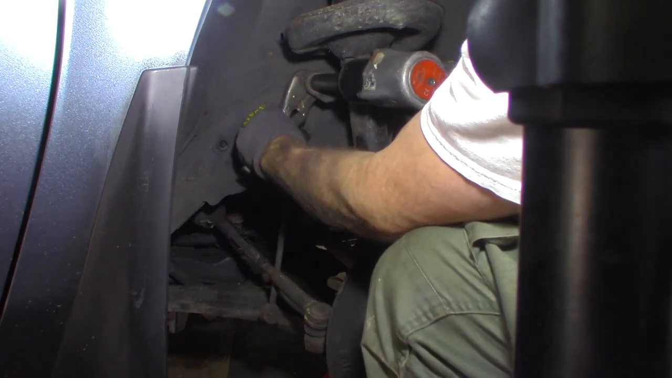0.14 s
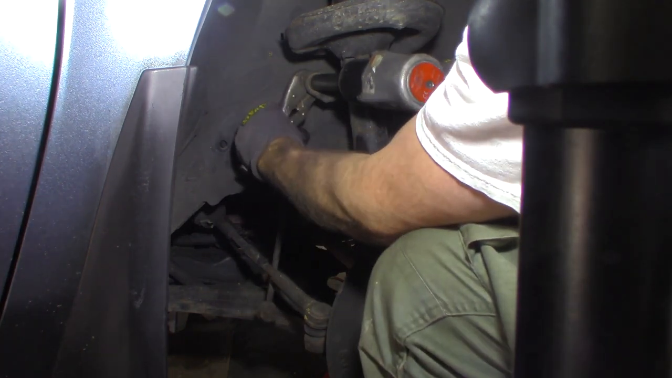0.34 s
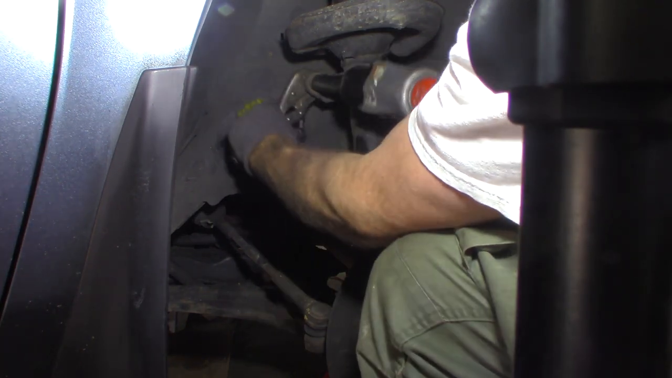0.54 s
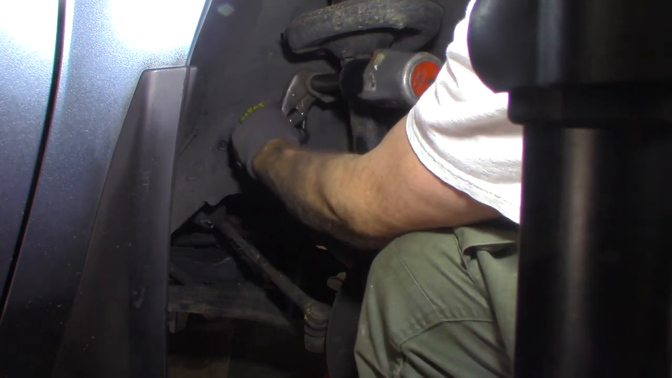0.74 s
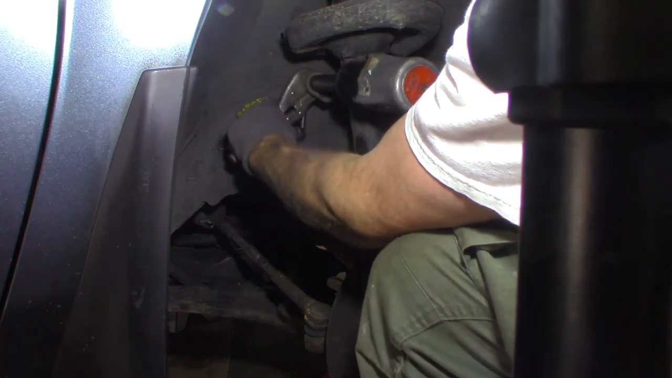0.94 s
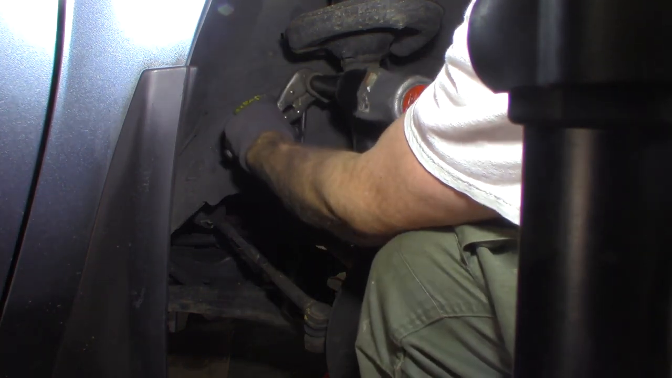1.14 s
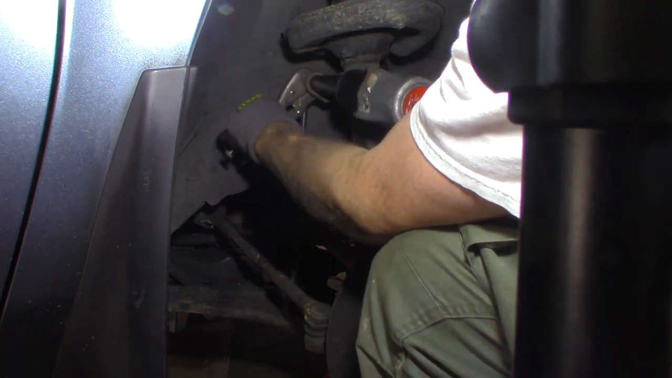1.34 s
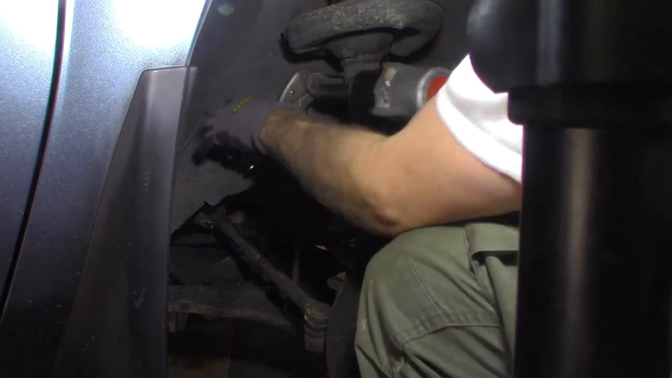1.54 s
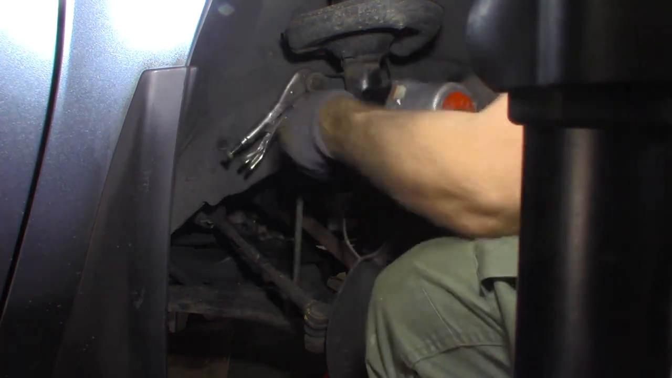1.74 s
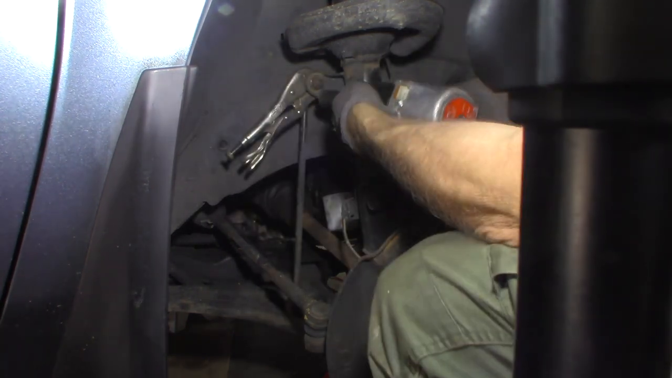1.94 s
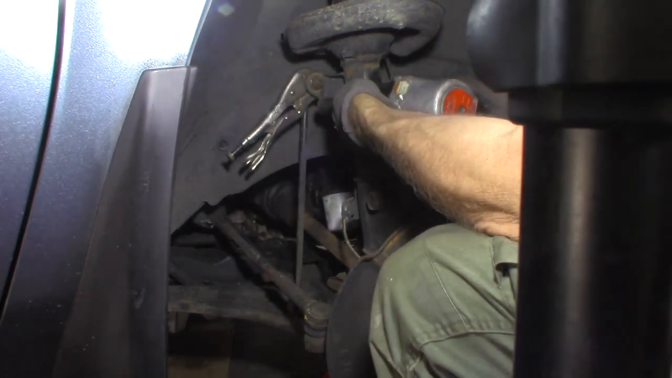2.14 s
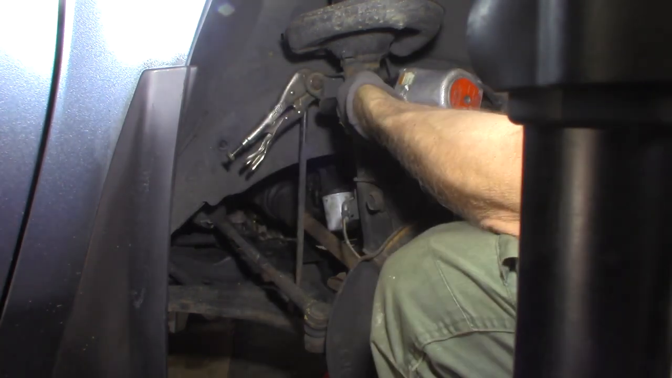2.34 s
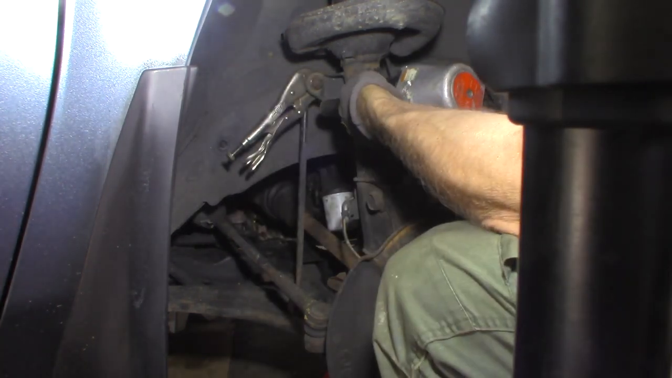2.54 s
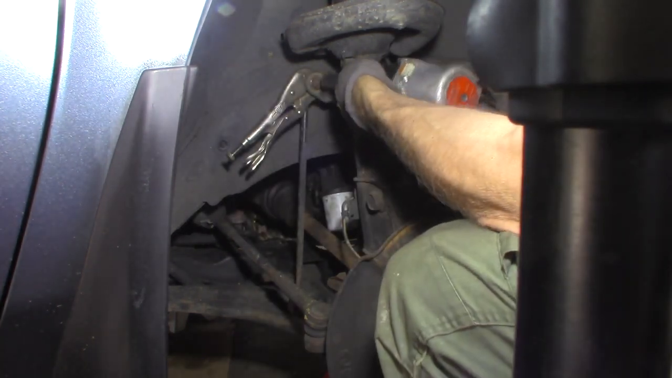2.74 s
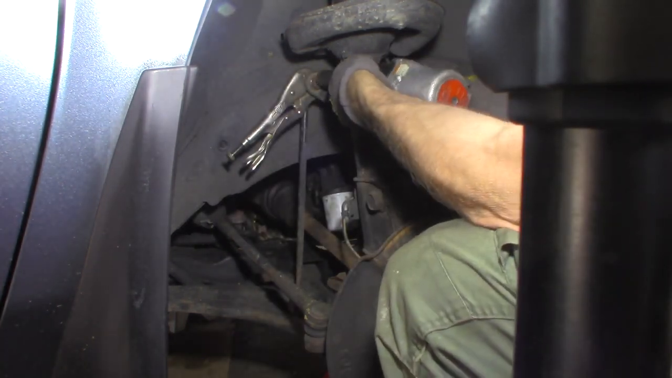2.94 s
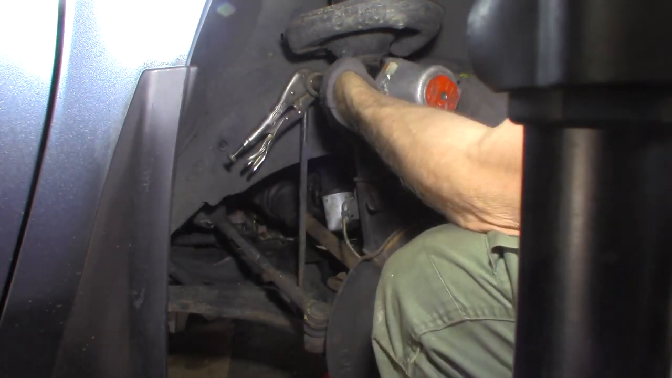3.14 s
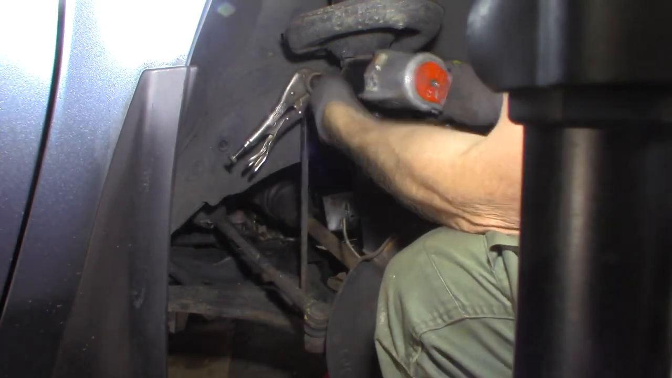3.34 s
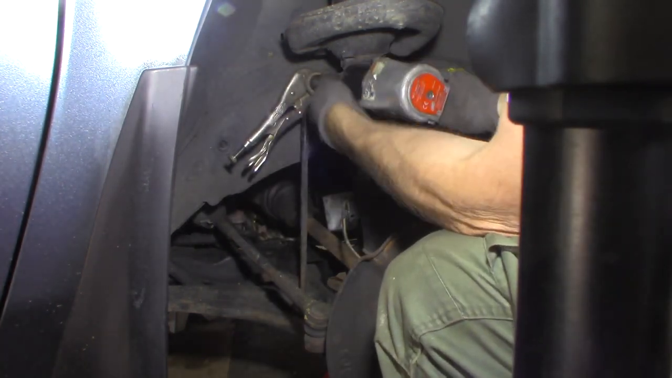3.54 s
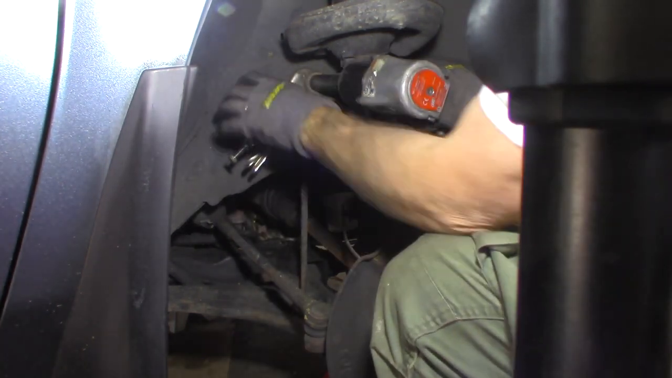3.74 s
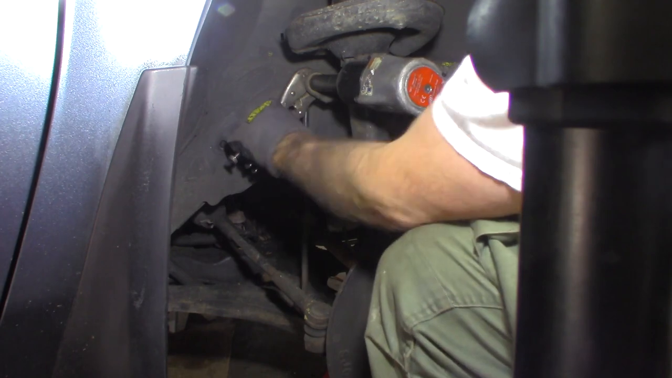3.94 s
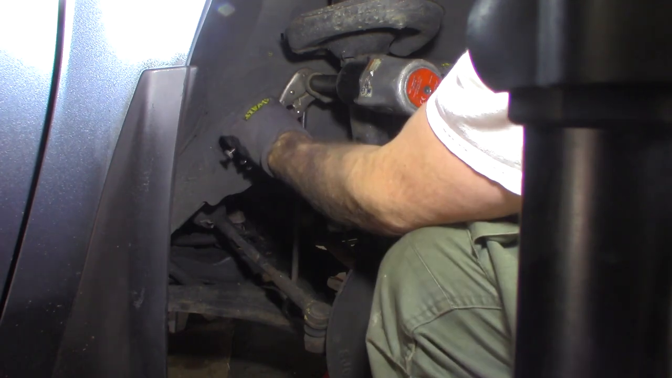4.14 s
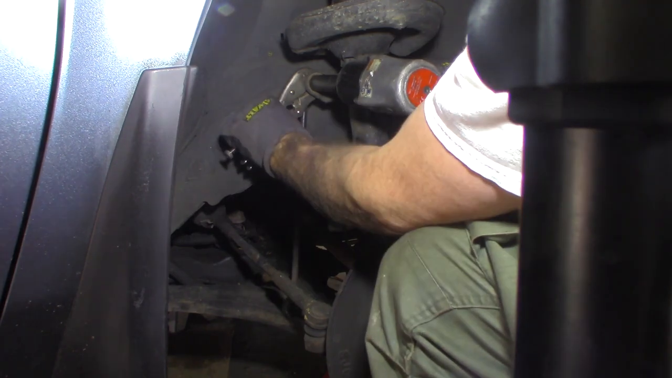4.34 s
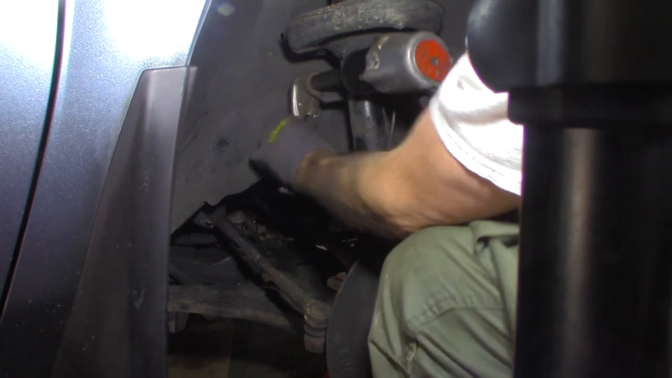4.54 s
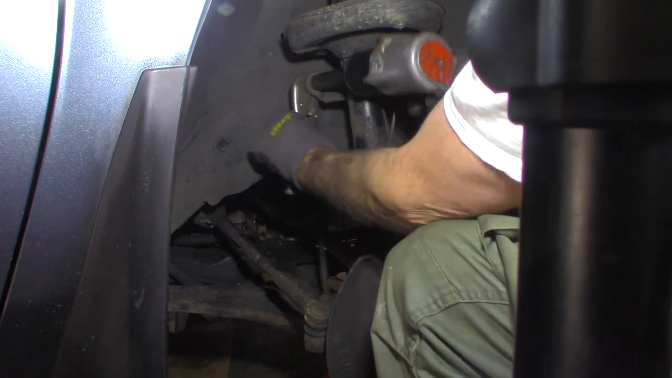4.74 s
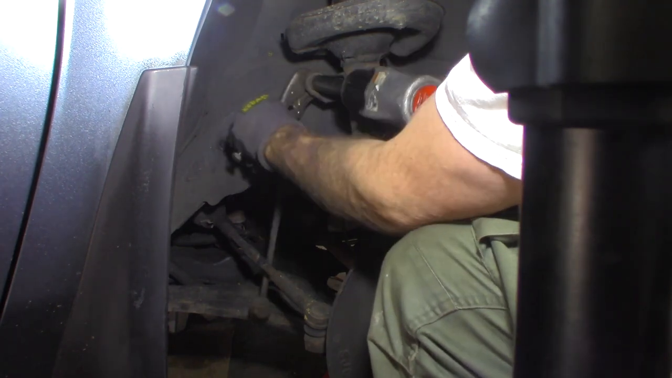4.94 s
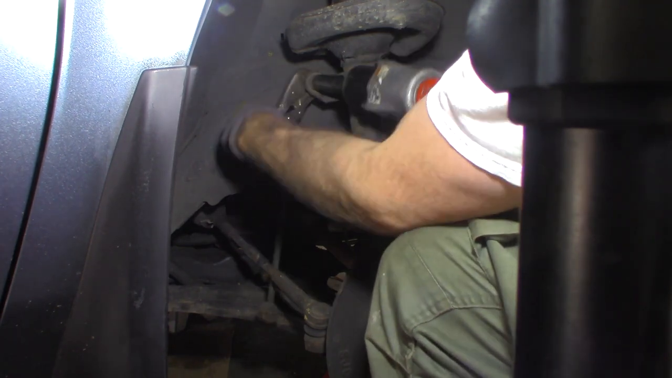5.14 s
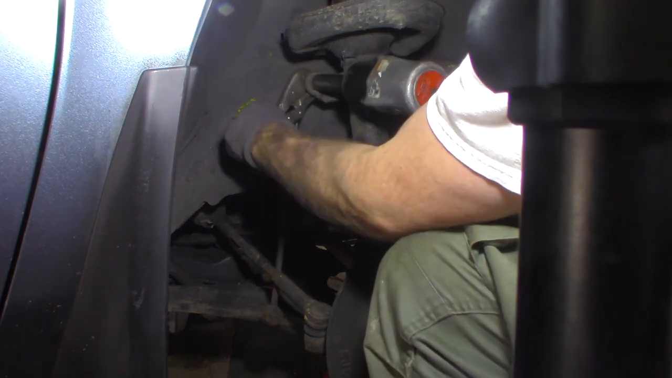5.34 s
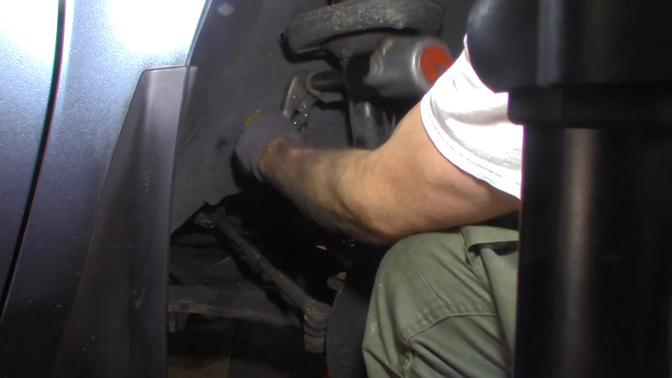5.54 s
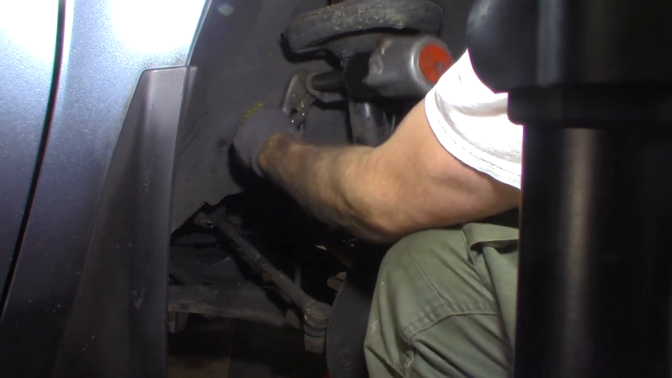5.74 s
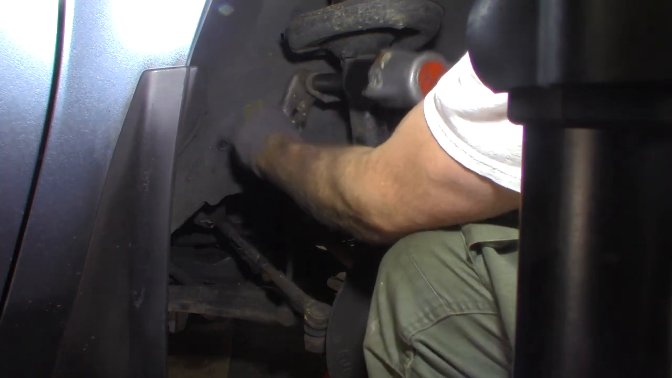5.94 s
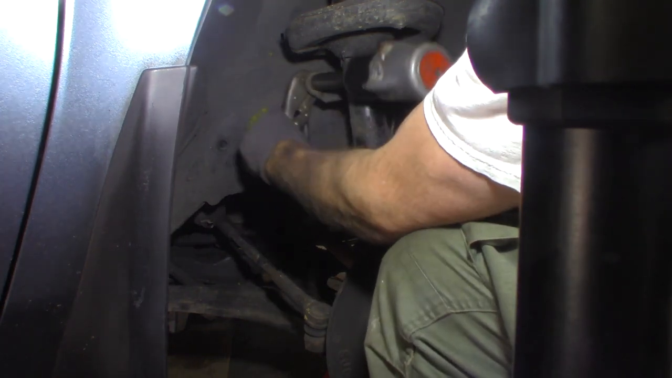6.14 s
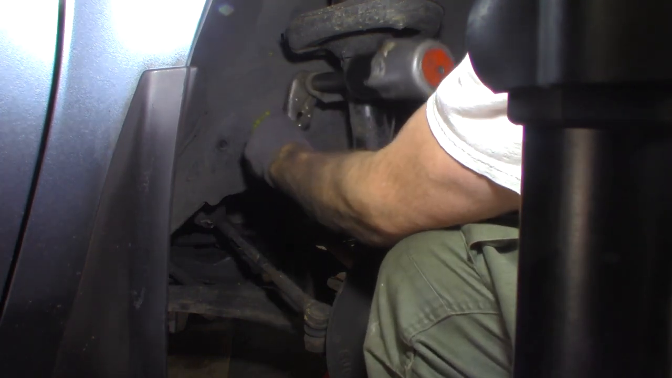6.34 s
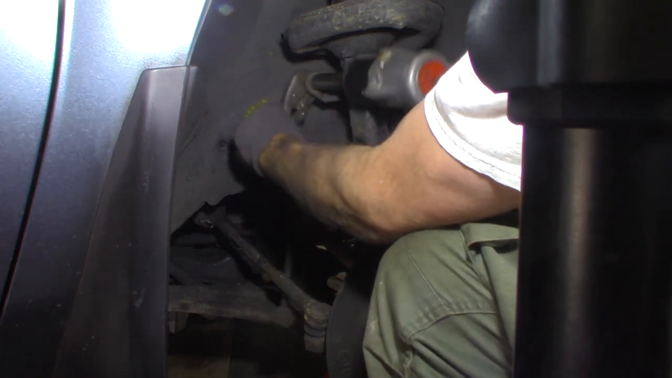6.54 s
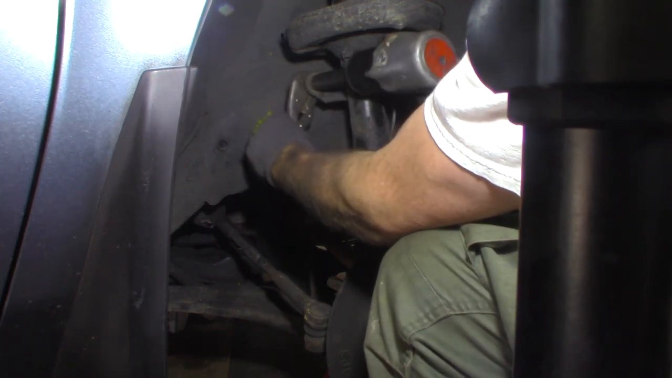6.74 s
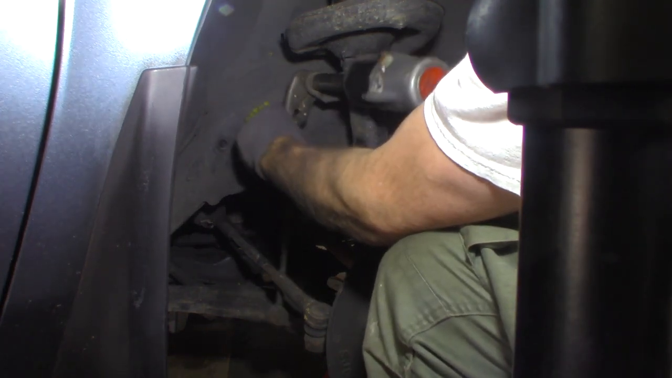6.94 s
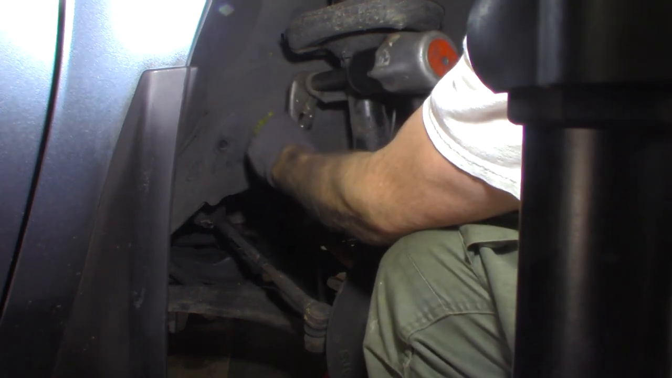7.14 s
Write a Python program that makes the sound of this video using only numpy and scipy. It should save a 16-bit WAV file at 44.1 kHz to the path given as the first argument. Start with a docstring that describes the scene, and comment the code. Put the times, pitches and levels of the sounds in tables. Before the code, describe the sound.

A close, loud pneumatic impact wrench in a garage with short reflections and faint dull room noise. After soft rubbing, the trigger opens at about 0.3 s: a rough howl and hiss with clustered metallic cracks, puffs of air and a tiny high whistle. The motor revs up and sags until 1.3 s, with scattered blows near 0.75, 0.9 and 1.05. Two steel clinks come at 1.4-1.5, then faint rustle and ticks. One hard, bright snap hits at 2.55 with a diffuse tail. Rattles and rubbing at 3.0-3.4 lead to a scrape of sliding steel at 3.55-3.75. At 4.4 a sharp blow starts a high-revving burst, hammering rapidly until 4.7 and stopping by 4.87. Heavy thuds and clanks follow, strongest at 5.16. From 5.48 to the end, steady hissing exhaust carries dense hammering runs, nearly fifty blows a second, with short gaps between.

```python
"""In a garage, a pneumatic impact wrench works a rusted nut in a car's wheel well.
The vane motor howls (pulse tones and noise) and hisses (chopped noise), sagging at each hammer blow.
Each blow is a dense crack on the anvil with a puff of air; short jet tones whistle now and then.
Between bursts the socket is pulled off, knocked about and slid back on: decaying clatter, one hard snap,
and uneven friction noise. Sparse garage reflections and room noise surround it; a limiter holds the peaks."""
import sys
import numpy as np
from scipy import signal
from scipy.fft import rfft, irfft
from scipy.io import wavfile
from scipy.ndimage import uniform_filter1d, minimum_filter1d

SR = 44100
rng = np.random.default_rng(int(sys.argv[2]) if len(sys.argv) > 2 else 0)


def dump(signal):
    """Clip the signal to [-1, 1] and save it as 16-bit WAV at the path in sys.argv[1]."""
    limited = np.clip(np.atleast_2d(signal).T, -1, 1)
    pcm = np.round(limited * 32767).astype(np.int16)
    wavfile.write(sys.argv[1], SR, pcm)


N = 317064
TIME = np.arange(N) / SR


def amp(db):
    """Decibels to gain."""
    return 10 ** (np.asarray(db) / 20)


def unit(x):
    """Scales to rms 1."""
    return x / np.sqrt(np.mean(x ** 2) + 1e-20)


def read(points, hz):
    """Reads a table on a log-frequency axis."""
    f, value = np.transpose(points)
    return np.interp(np.log(hz + 1), np.log(f + 1), value)


def add(mix, s, sound):
    """Mixes a sound in at a time in seconds."""
    part = mix[max(round(s * SR), 0):][:len(sound)]
    part += sound[:len(part)]


def colour(x, spectrum, size=4096):
    """Causal (minimum-phase) filter with the shape of the given spectrum and energy 1."""
    hz = abs(np.fft.fftfreq(size, 1 / SR))
    log_gain = np.log(amp(read(spectrum, hz)))
    response = np.exp(np.conj(signal.hilbert(log_gain)))
    taps = np.fft.ifft(response).real[:size // 2]
    return signal.oaconvolve(x, taps / np.linalg.norm(taps))[:N]


def noise():
    """White noise."""
    return rng.standard_normal(N)


def wander(rate_hz):
    """Random drift of rms 1, mostly slower than the given rate."""
    lowpass = 1 / (1 + (np.fft.rfftfreq(N, 1 / SR) / rate_hz) ** 4)
    return unit(irfft(rfft(noise()) * lowpass, N))


def strike(t60, rise_s=0.00071, size=12000):
    """A dense, even clatter of contacts that builds up quickly and dies away by 60 dB in t60 seconds."""
    t = np.arange(size) / SR
    contacts = rng.choice([-1., 1.], size)
    return contacts * (1 - np.exp(-t / rise_s)) * amp(-60 * t / t60)


# Room noise. Each row: frequency in Hz, relative level in dB per Hz.
ROOM_NOISE_SPECTRUM = [(25,-26),(80,-7),(300,-6),(600,-11.5),(2000,-19.5),(9000,-33.5),(16000,-47)]


def room_noise(level_db=-54):
    """Steady, dull background: coloured noise."""
    return amp(level_db) * colour(noise(), ROOM_NOISE_SPECTRUM)


# Shifts of gloves and tool, each swelling and fading. Each row: peak in seconds, rise in seconds,
# fade in seconds, dull rubbing in dB and fine rustle in dB, both before the trims in handling().
SHIFTS = [(0,0.054,0.083,-38,-69),(1.56,0.057,0.27,-43,-46),(1.84,0.017,0.014,-53.5,-47),(2.08,.1,.15,-57.5,-63),(3.13,.05,0.066,-32.5,-56),(3.39,0.06,0.063,-34,-52),(3.83,0.065,0.055,-56,-43),(3.92,0.045,0.092,-50,-67),(4.17,0.05,0.064,-49,-71),(5.28,0.058,0.078,-26.5,-54)]
# Sliding steel. Each row: frequency in Hz, relative level in dB per Hz.
SCRAPE_SPECTRUM = [(40,-36),(130,-6),(320,-0.5),(800,-5),(1100,-0.5),(1900,-18),(2150,-14),(2380,-3),(2820,-11),(3100,-21),(4050,-33),(4400,-8.5),(4900,-24),(6000,-30),(6600,-15),(7600,-29),(8150,-18),(9000,-31),(15000,-50)]
# Dull rubbing, with the car body's low boom near 128 Hz. Each row: frequency in Hz, relative level in dB per
# Hz.
RUB_SPECTRUM = [(30,-28.5),(100,-13),(128,10),(165,-4),(300,4.5),(600,-3.5),(1200,-14.5),(2400,-25.5),(6000,-54)]
GRIP_RUB_DB, GRIP_RUSTLE_DB = -71.5, -73  # the gloves never lie quite still; before the same trims
# the socket sliding on steel
SLIDE_START_S, SLIDE_END_S = 3.53, 3.742
SLIDE_RISE_S, SLIDE_FALL_S, SLIDE_DB = 0.092, 0.037, -31.5


def handling(grain_db=1.5, rub_trim_db=-3, rustle_trim_db=-3):
    """Uneven friction of sliding steel, gloves and sleeves: noise whose level wanders."""
    def slips():
        return unit(noise() * amp(grain_db * wander(170)))
    rise = (TIME - SLIDE_START_S) / SLIDE_RISE_S
    fall = (SLIDE_END_S - TIME) / SLIDE_FALL_S
    push = np.clip(np.minimum(rise, fall), 0, 1)
    dull, fine = amp(GRIP_RUB_DB), amp(GRIP_RUSTLE_DB)
    for s, rise_s, fade_s, dull_db, fine_db in SHIFTS:
        swell = np.exp(-np.maximum((s - TIME) / rise_s, (TIME - s) / fade_s))
        dull = dull + amp(dull_db) * swell
        fine = fine + amp(fine_db) * swell
    slide = amp(SLIDE_DB) * colour(slips() * push, SCRAPE_SPECTRUM)
    rub = amp(rub_trim_db) * colour(slips() * dull, RUB_SPECTRUM)
    rustle_spectrum = [(1000, -8.5), (3000, -2), (6500, 0), (10000, -10.0), (15000, -18.5)]  # (Hz, dB per Hz)
    rustle = amp(rustle_trim_db) * colour(slips() * fine, rustle_spectrum)
    return slide + rub + rustle


# How fast the garage dies away. Each row: frequency in Hz, decay t60 in seconds.
GARAGE_DECAY = [(100,0.28),(400,0.4),(1000,0.66),(2800,0.59),(7300,0.37),(15000,0.77)]


def garage(x, size=20):
    """Sparse reflections of random sign, each band dying at its own speed."""
    taps = np.zeros(SR)
    at = np.arange(int(.006 * SR), SR - size, size)  # one in each slot of `size` samples, from 6 ms on
    taps[at + rng.integers(0, size, len(at))] = rng.choice([-1., 1.], len(at))
    hz, t, bands = signal.stft(taps, SR, nperseg=256)
    decay = amp(-60 * t / read(GARAGE_DECAY, hz)[:, None])
    tail = signal.istft(bands * decay, SR, nperseg=256)[1]
    return signal.oaconvolve(x, tail / np.linalg.norm(tail))[:N]


# The motor while the trigger is held, one curve a pull. Each row: time in seconds, vane pulses a second,
# air flow in dB before the speed tilt and trims, roughness (0 tonal to 1 noisy, clipped).
PULLS = [
    [(.33,193,-10.5,.9),(.38,215,-20.5,1),(.45,280,-12,0.85),(.5,306,-16.5,0.7),(.64,395,-13.5,0.98),(.69,440,-22,1.04),(.735,183,-12,0.46),(.79,340,-13.5,0.1),
     (.845,398,-12,0),(.885,370,-18,0.38),(1,397,-13.5,0.35),(1.05,262,-15.5,.64),(1.135,245,-19.5,.77),(1.17,255,-16,0.69),(1.29,288,-15.5,0.74)],
    [(4.408,410,-12,0.59),(4.446,380,-12,0.17),(4.472,460,-11,0),(4.497,530,-14.5,.05),(4.52,406,-15,0.76),(4.63,330,-12.5,0.66),(4.76,230,-17,.9),(4.85,230,-16.5,0.91)],
    [(5.49,265,-14.5,0.55),(5.9,288,-16,0.88),(6.24,296,-15,0.89),(7.19,305,-14.5,0.88)],
]
# How the valve opens, one row a pull. Each row: opening time in seconds, starting level in dB
# relative to the pull's first flow.
VALVE = [(.038,-21.5),(.032,-33),(.031,-17)]
WORK_HZ = 287.6  # vane pulses a second at which exhaust and hiss have no tilt
EXHAUST_DB_PER_OCTAVE, HISS_DB_PER_OCTAVE = 0.5, -4  # a fast motor howls, a slow one hisses
RECOVER_S, RECOVER_DB = 0.035, -3  # after a run of blows the motor takes a moment to pick up again
# after the trigger is let go
COAST_DB_PER_S, HISS_SHUT_DB_PER_S, COAST_OCTAVES_PER_S = 108, 131, 2.8


def trigger():
    """Motor speed, roughness and the gains of exhaust and hiss: each pull opens, holds and coasts down."""
    hz, rough = np.full(N, float(WORK_HZ)), np.ones(N)
    exhaust_gain, hiss_gain = np.zeros((2, N))
    for pull, (open_s, open_db) in zip(PULLS, VALVE):
        s, *columns = np.transpose(pull)
        speed, flow_db, roughness = (np.interp(TIME, s, column) for column in columns)
        on = TIME >= s[0] - open_s
        coast_s = np.maximum(TIME - s[-1], 0)
        flow_db = flow_db + open_db * np.clip((s[0] - TIME) / open_s, 0, 1)
        for _, last, *_ in RUNS:
            flow_db = flow_db + RECOVER_DB * (TIME > last) * np.exp(-abs(TIME - last) / RECOVER_S)
        octaves = np.log2(speed / WORK_HZ)
        exhaust_db = flow_db + EXHAUST_DB_PER_OCTAVE * octaves - COAST_DB_PER_S * coast_s
        hiss_db = flow_db + HISS_DB_PER_OCTAVE * octaves - HISS_SHUT_DB_PER_S * coast_s
        exhaust_gain += on * amp(exhaust_db)
        hiss_gain += on * amp(hiss_db)
        slowed = speed * 2 ** (-COAST_OCTAVES_PER_S * np.minimum(coast_s, .3))
        hz = np.where(on, slowed, hz)
        rough = np.where(on, roughness + 2 * coast_s, rough)
    return hz, np.clip(rough, 0, 1), exhaust_gain, hiss_gain


# Exhaust through the muffler. Each row: frequency in Hz, relative level in dB per Hz.
MUFFLER_SPECTRUM = [(30,-41),(70,-24),(120,-16),(210,-3),(330,-6.5),(560,-2),(800,-2.5),(1150,-5),(1600,-11),(2500,-15),(4000,-25),(12000,-47.5)]
# Hiss of the air jet. Each row: frequency in Hz, relative level in dB per Hz.
JET_SPECTRUM = [(500,-26),(1500,2.5),(2600,1.5),(3700,3),(5000,4),(6200,4),(7400,0),(9000,-2.5),(11000,-9),(13000,-19.5),(16000,-42)]


def motor(strikes, exhaust_trim_db=0.5, hiss_trim_db=-2, stall_db=-8.0, hiss_stall_db=-5,
          jitter=0.01115, chop=0.15, vane_spread=0.13):
    """Vanes chop the air into pulses and hiss; the flow drops while the hammer holds the rotor back."""
    hz, rough, exhaust_gain, hiss_gain = trigger()
    vanes_passed = np.cumsum(hz * (1 + jitter * wander(59.6))) / SR
    # five harmonics, with phases k ** 2 that spread each pulse out and soften its peaks
    pulses = unit(sum(np.cos(2 * np.pi * k * vanes_passed + k ** 2) for k in range(1, 6)))
    pulses *= 1 + vane_spread * np.cos(2 * np.pi * vanes_passed / 6)  # uneven over every six pulses
    gate = unit(1 + chop * np.cos(2 * np.pi * vanes_passed))
    tonal = np.sqrt(1 - rough) * unit(colour(pulses, MUFFLER_SPECTRUM))
    noisy = np.sqrt(rough) * colour(gate * noise(), MUFFLER_SPECTRUM)
    hiss = colour(gate * noise(), JET_SPECTRUM) * amp(.5 * wander(39))
    stall = np.zeros(N)
    for s, _, _ in strikes:
        add(stall, s - .006, np.hanning(int(0.042 * SR)))
    stall = np.minimum(stall, 1)
    exhaust = (tonal + noisy) * exhaust_gain * amp(exhaust_trim_db + stall_db * stall)
    return exhaust + hiss * hiss_gain * amp(hiss_trim_db + hiss_stall_db * stall)


# Brief whistles of the air passages. Each row: start in seconds, length in seconds, pitch in Hz, level in dB.
WHISTLES = [(0.296,0.022,6370,-15.5),(0.702,0.056,5900,-20.5),(1.531,0.013,9760,-39.5),(4.511,0.026,10070,-24)]


def whistles(width_hz=170):
    """Narrow, unsteady jet tones: sines whose pitch wanders."""
    out = np.zeros(N)
    drift = np.cumsum(width_hz * wander(500)) / SR
    for s, length_s, hz, db in WHISTLES:
        n = int(length_s * SR)
        tone = np.sin(2 * np.pi * (hz * TIME[:n] + drift[int(s * SR):][:n]))
        add(out, s, amp(db) * unit(tone * signal.windows.tukey(n, .4)))
    return out


# Lone blows, when the nut grabs and gives again. Each row: time in seconds, crack in dB before the
# trim in hammer(), puff in dB.
BITES = [(.3236,-9,-39.5),(.3335,-7,-24),(.342,-10.5,-14),(.3919,-12,-13),(.4155,-14,-18.5),(.438,-13,-7.5),(.451,-11.5,-16.5),(.7297,-10.5,-17),(.738,-7.5,-17.5),(.7765,-8,-8.5),
         (.9051,-11.5,-17),(1.0209,-11.5,-29),(1.0294,-5.5,-10),(1.0933,-9,-31.5),(4.404,-13,-14),(4.4123,-2,-7),(4.7452,-12,-29),(4.8596,-18,-38),(5.481,-5,-10.5),(6.7995,-10,-14)]
# Runs of steady hammering. Each row: first blow in seconds, last blow in seconds (both before limp and
# jitter), slowing as the share by which the gaps grow, crack in dB before the trim, first blow's extra
# in dB, puff in dB, hammer that leads (0 strong puff, 1 weak puff).
RUNS = [(4.5368,4.71,.05,-12.5,-2,-12,0),(5.508,5.744,.1,-13,5,-10.5,0),(5.931,6.122,0.092,-12.5,1,-12.5,0),(6.258,6.4713,0.097,-12.5,3,-11.5,1),
        (6.5943,6.8003,0.003,-13.5,8,-11,0),(6.829,6.894,0,-14,-7,-14.5,1),(6.9775,7.1664,.13,-13,4,-10.5,0)]
BLOW_GAP_S = .021  # nominal, sets how many blows fit a run
BLOW_JITTER_S, BLOW_SPREAD_DB = .0009, 1.4  # chance in the timing and strength of each blow
# the two hammers alternate: one strikes a little late and frees most of the air
LIMP_S, WEAK_PUFF_DB = .0005, -13.5
CATCH_S, CATCH_DB = .0108, 1.5  # one catch of the hammer comes just before each run


def blows():
    """Every hammer blow as (s, crack dB, puff dB): lone bites, and runs that slow a little as they go."""
    rows = list(BITES)
    for first, last, slowing, crack_db, accent_db, puff_db, lead in RUNS:
        k = np.arange(round((last - first) / BLOW_GAP_S) + 1)
        weak = (k + round(lead)) % 2
        u = k / k[-1]
        slowed = first + (last - first) * (u - slowing / 2 * u * (1 - u))
        limp = LIMP_S * (1 - 2 * weak)
        times = slowed + limp + BLOW_JITTER_S * rng.standard_normal(len(k))
        cracks = crack_db + accent_db * (k == 0) + BLOW_SPREAD_DB * rng.standard_normal(len(k))
        rows.append((first - CATCH_S, crack_db + CATCH_DB, puff_db + WEAK_PUFF_DB / 2))
        rows += zip(times, cracks, puff_db + WEAK_PUFF_DB * weak)
    return rows


# Crack of hammer on anvil. Each row: frequency in Hz, relative level in dB per Hz.
CRACK_SPECTRUM = [(30,-25.5),(100,-3),(500,9),(1300,1),(2100,-1.5),(2520,7),(2950,-2.5),(3450,6),(3900,-3),(4750,5.5),(5850,6),(7400,-0.5),(8550,3.5),(9400,2),(10700,0),(12500,-7.5),(16000,-17)]
# Puff of freed air. Each row: frequency in Hz, relative level in dB per Hz.
PUFF_SPECTRUM = [(60,-53.5),(200,-6),(400,-6),(520,-2),(650,-9),(780,6),(900,3.5),(1080,-17),(1500,-8.5),(3000,-39.5),(9000,-55.5)]


def hammer(strikes, crack_trim_db=5.5, puff_s=0.03, puff_delay_s=-0.0015):
    """Each blow cracks on the anvil; the freed rotor lets out a puff of air that swells after it."""
    cracks, puffs = np.zeros((2, N))
    swell = np.hanning(int(puff_s * SR))
    for s, crack_db, puff_db in strikes:
        add(cracks, s, amp(crack_db) * strike(.065, rise_s=.0005))
        add(puffs, s + puff_delay_s, amp(puff_db) * swell)
    air = colour(noise(), PUFF_SPECTRUM)
    air /= np.sqrt(uniform_filter1d(air ** 2, size=500))  # evened out, so each puff keeps its given level
    return amp(crack_trim_db) * colour(cracks, CRACK_SPECTRUM) + puffs * air


# Knocks of socket, tool and pliers. Each row: time in seconds, thud, clank and ring in dB before the
# trims in knocks(), decay t60 in seconds (the thud's is stretched).
KNOCKS = [(1.418,-48,-27,-20.5,.05),(1.488,-33.5,-17.5,-16,0.063),(1.949,-59,-44.5,-63,0.036),(2.028,-64,-47,-46.5,0.083),(2.154,-59.5,-47.5,-46.5,.079),(2.243,-56,-44,-54.5,0.038),(2.277,-57,-44.5,-59,0.032),
          (2.539,-58,-42,-49,0.14),(2.963,-32,-30.5,-51,0.13),(3.0254,-31,-20.5,-25,.098),(3.096,-29.5,-29.5,-33,0.1),(3.115,-30,-29,-29.5,.048),(3.287,-50,-37.5,-43,0.086),(3.3006,-49,-25,-14.5,0.051),
          (3.344,-34,-30,-25,0.071),(3.357,-33,-33.5,-24.5,0.036),(3.491,-37,-41,-53,0.039),(4.072,-57,-46.5,-55,.034),(4.868,-11.5,-20.5,-16,.13),(4.899,-13,-19,-19.5,0.26),(4.935,-20,-24,-22,0.21),
          (5.157,-6.5,-10,-6.5,0.039),(5.18,-15.5,-26,-40,0.13),(5.458,-18,-29,-44,0.082)]
# Thud in the car body. Each row: frequency in Hz, relative level in dB per Hz.
THUD_SPECTRUM = [(30,-64),(85,-10.5),(125,-7),(165,-5),(230,3),(310,6),(430,0),(800,-8.5),(2500,-74)]
# Clank of steel. Each row: frequency in Hz, relative level in dB per Hz.
CLANK_SPECTRUM = [(100,-46),(450,-4.5),(650,5),(1200,3),(1650,6),(2100,3.5),(2600,1),(4000,-59),(9000,-20),(15000,-70)]
# Bright ring. Each row: frequency in Hz, relative level in dB per Hz.
RING_SPECTRUM = [(1200,-35),(2800,3.5),(3700,4.5),(4350,10),(4950,4),(5800,1),(7200,0),(11000,-14),(12500,-34),(16000,-35)]
# Loosely held steel ringing on. Each row: frequency in Hz, relative level in dB per Hz.
STEEL_SPECTRUM = [(600,18),(1500,-3),(1900,7),(2100,25),(2400,-12),(3900,-50),(4350,-6),(4900,-36),(9000,-1.5)]


def knocks(thud_trim_db=2, clank_trim_db=3, ring_trim_db=2.5, after_ring_db=-11, after_ring_t60=0.12,
           thud_longer=1.7):
    """Loose steel parts knock together: a thud in the car body, a clank and a bright ring."""
    thud, clank, ring = np.zeros((3, N))
    for s, thud_db, clank_db, ring_db, t60 in KNOCKS:
        add(thud, s, amp(thud_db + thud_trim_db) * strike(t60 * thud_longer, rise_s=0.0054))
        add(clank, s, amp(clank_db + clank_trim_db) * strike(t60))
        add(ring, s, amp(ring_db + ring_trim_db) * strike(t60))
    steel = colour(clank, CLANK_SPECTRUM) + colour(ring, RING_SPECTRUM)
    tail = strike(after_ring_t60)  # many close modes ring on together
    after_ring = colour(signal.oaconvolve(steel, tail / np.linalg.norm(tail)), STEEL_SPECTRUM)
    return colour(thud, THUD_SPECTRUM) + steel + amp(after_ring_db) * after_ring


# One hard snap of steel coming free, a single row: time in seconds, level in dB, decay t60 in seconds.
SNAP_HIT = (2.5538, -4.5, 0.059)
# The snap's colour. Each row: frequency in Hz, relative level in dB per Hz.
SNAP_SPECTRUM = [(150,-42),(300,-35),(520,0.5),(1000,-1.5),(1500,2.5),(2900,1.5),(3900,-5.5),(5500,1.5),(7800,-2.5),(8800,3),(10000,-11.5),(12500,-10),(16000,-23)]


def snap(tail_db=-18.0, tail_t60=0.52):
    """A single very short contact, bright and with little bass, and its diffuse tail in the garage."""
    s, db, t60 = SNAP_HIT
    out = np.zeros(N)
    add(out, s, amp(db) * strike(t60))
    add(out, s, amp(db + tail_db) * strike(tail_t60, size=30000))
    return colour(out, SNAP_SPECTRUM)


def scene(room_db=-8, side_db=-21, side_noise_db=-16):
    """All sources are close and central; only faint reflections and room noise differ between the ears."""
    strikes = blows()
    near = hammer(strikes) + motor(strikes) + whistles() + knocks() + handling()
    mid = near + snap() + amp(room_db) * garage(near) + room_noise()
    # (Hz, dB per Hz): the reflections at the sides are bright
    side_spectrum = [(40, 2.0), (200, -6), (700, 0.0), (1400, 0.5), (8000, 12.0), (14000, 2)]
    side = amp(side_db) * colour(garage(mid), side_spectrum)
    side += amp(side_noise_db) * room_noise()
    return np.array([mid + side, mid - side])


def record(dry, recover_db_per_s=400, ceiling_db=-.7, edge_hz=16050):
    """A quick peak limiter, shared by both channels, then a steep cut of the highest treble."""
    level_db = 20 * np.log10(abs(dry).max(0) + 1e-9)
    peak_db = -minimum_filter1d(-level_db, size=40)
    fall = TIME * recover_db_per_s
    held_peak_db = np.maximum.accumulate(peak_db + fall) - fall  # jumps up, then falls steadily
    over_db = np.maximum(held_peak_db - ceiling_db, 0)
    limited = dry / amp(uniform_filter1d(over_db, size=40))
    lowpass = signal.firwin(701, edge_hz, window=("kaiser", 9), fs=SR)
    return signal.oaconvolve(limited, lowpass[None], "same")


dry = scene()
out = record(dry)
dump(out)
```